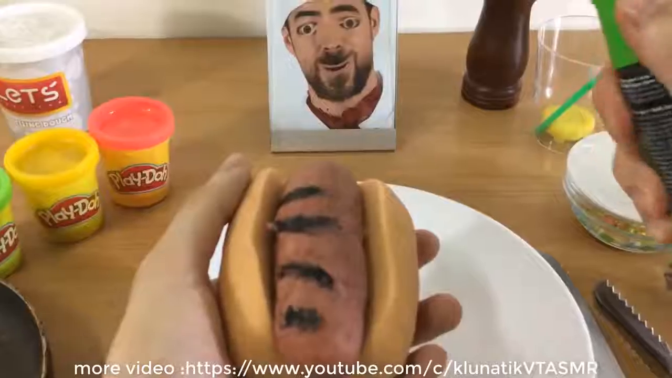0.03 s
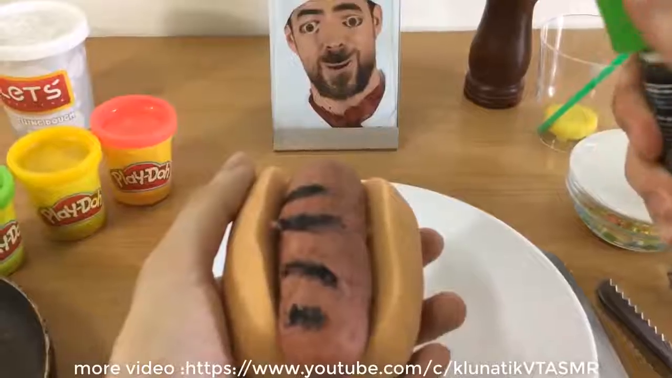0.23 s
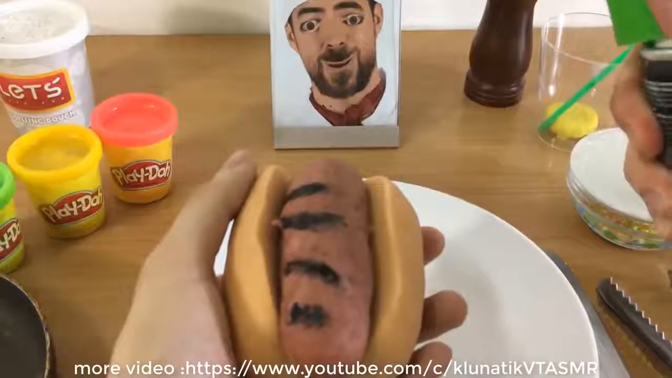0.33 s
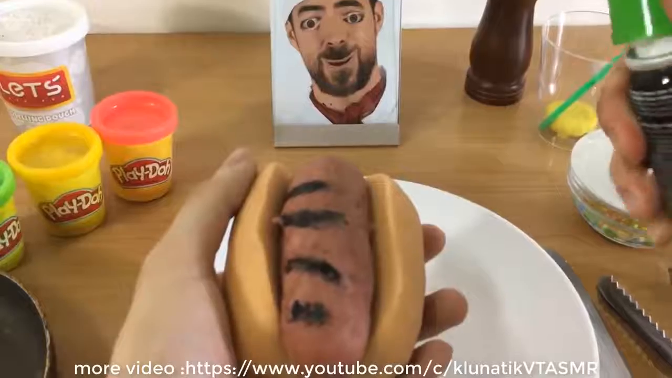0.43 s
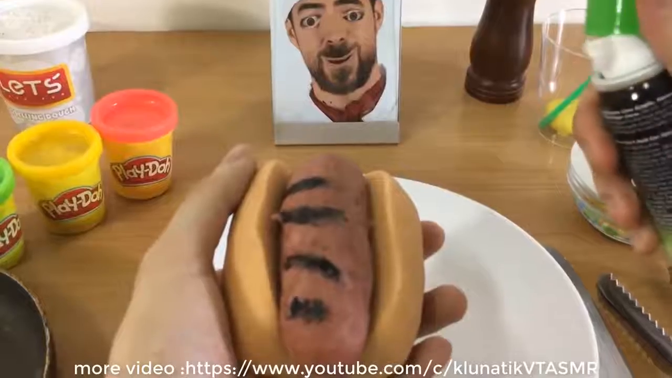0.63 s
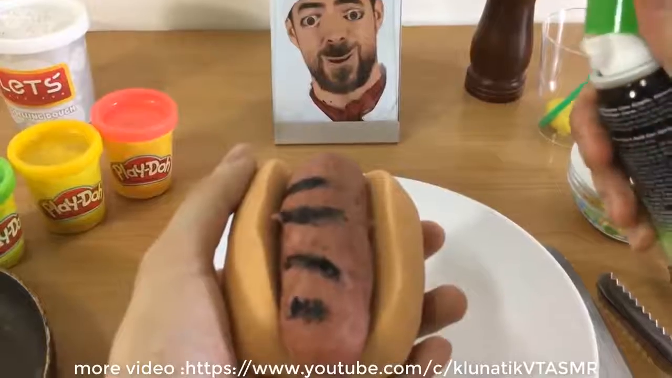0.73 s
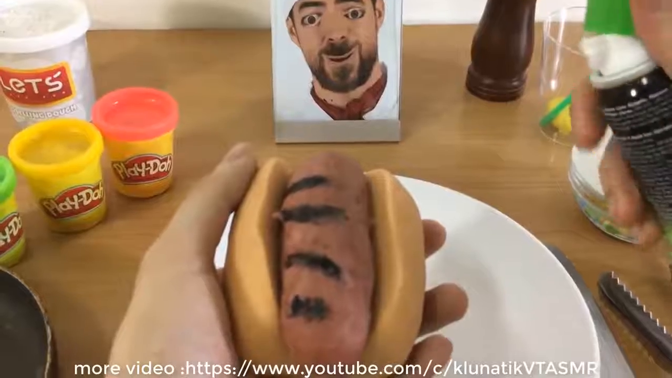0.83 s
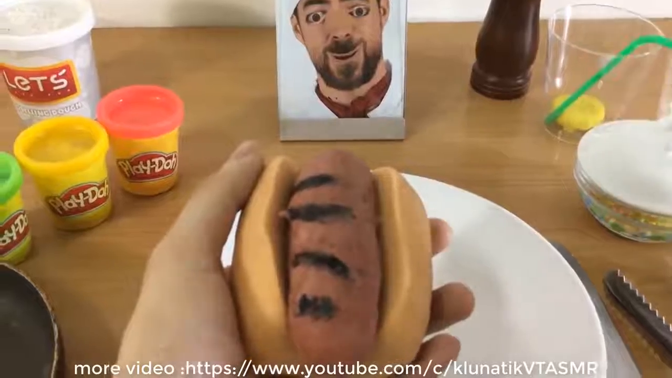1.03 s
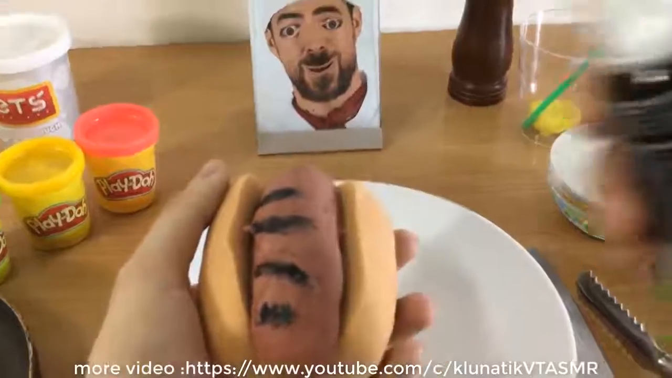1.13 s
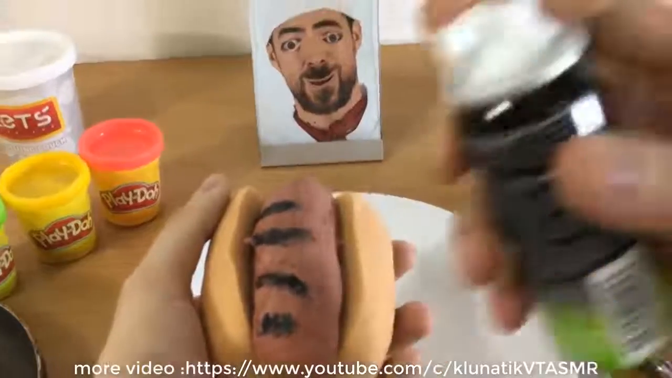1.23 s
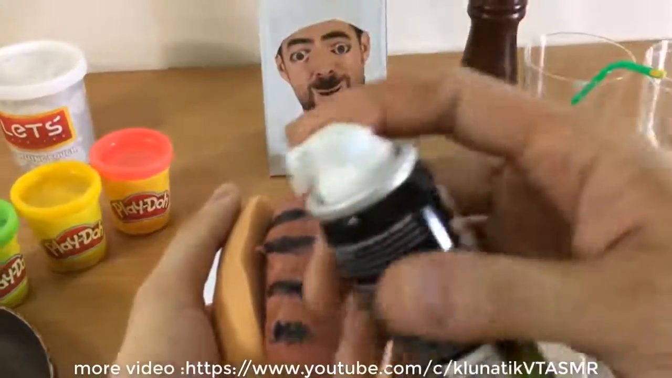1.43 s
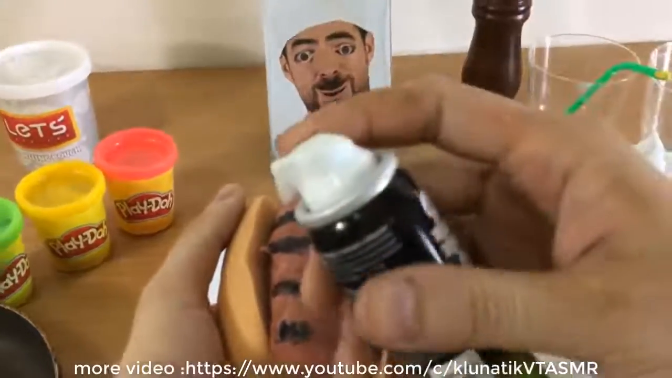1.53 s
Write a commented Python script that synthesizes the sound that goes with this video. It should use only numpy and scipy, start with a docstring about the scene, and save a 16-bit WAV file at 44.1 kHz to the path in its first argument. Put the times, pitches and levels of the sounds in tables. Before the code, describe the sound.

Plastic cap pops off a spray can, after a small click, with faint finger handling indoors

```python
"""Close at a table in a hard-walled room, on two microphones: a low house hum runs under everything.
Fingers rub and tick on an aerosol can; its plastic cap slips one notch, then pops free with a puff of
air, and the room rings after each. Then the fingers rub and tick on the can again.
Hum, crack, ticks, rubs and room are shaped noise; the cap and the air under it are decaying sines."""
import sys
import numpy as np
from scipy import signal
from scipy.fft import rfft, irfft, next_fast_len
from scipy.io import wavfile

SR = 44100
rng = np.random.default_rng(int(sys.argv[2]) if len(sys.argv) > 2 else 0)


def unload_audio(sound):
    """Save the sound as a 16-bit wav file, at the path given as the first command line argument."""
    columns = np.transpose(np.atleast_2d(sound))
    # keep every value between -1 and 1, then stretch to whole-number steps
    steps = np.round(np.clip(columns, -1, 1) * 32767)
    wavfile.write(sys.argv[1], SR, steps.astype(np.int16))


def convert_level_to_amplitude(level_db):
    """Map a level in decibels to its linear amplitude factor."""
    exponent = np.asarray(level_db, float) / 20
    return 10 ** exponent


N = 70560

# House hum and microphone hiss, spectrum: f/Hz, relative level/dB
HUM_SPECTRUM = [(12, -33), (20, -10.5), (33, -1), (45, 4), (62, -2.5), (100, -3), (125, -7.5), (165, -7),
                (205, -1.5), (235, -10), (280, -10.5), (614, -19.5), (910, -20.5), (1270, -25.5),
                (1600, -26.5), (2000, -34), (5640, -43.5), (11500, -46.5), (13000, -55.5), (16400, -82.5)]
# Likeness of the hum at the two microphones: f/Hz, likeness/1
HUM_LIKENESS = [(60, 0.19), (180, 0.65), (420, 0.12), (900, 0.86), (1650, 0.59), (4970, 0.074),
                (15000, 0.05)]
# Balance of the hum: f/Hz, left over right/dB
HUM_BALANCE = [(60, 4), (240, 1), (950, -1.5), (3770, -2), (15000, 1)]
# Phase lead of the left microphone, for room and hum: f/Hz, lead/rad
LEFT_LEAD = [(150, 0.55), (450, 0.22), (1500, 0.28), (4000, 0.0203)]
# Decay of the late room tail: f/Hz, t60/s
ROOM_DECAY = [(100, 0.64), (220, 0.92), (500, 0.61), (1000, 0.86), (1800, 0.87), (3000, 0.68), (5500, 0.73),
              (8000, 0.62), (11000, 0.5), (13000, .36), (16000, 0.25)]
# Colour of the room after a pop: f/Hz, relative level/dB
ROOM_SPECTRUM = [(35, -46.5), (60, -18), (268, -1), (458, -2), (682, -5), (842, -16), (1010, -7),
                 (1910, -15.5), (2410, -15.5), (5210, -19.5), (7060, -27), (11000, -27.5), (14600, -29),
                 (16000, -52.5)]
# Likeness of the room at the two microphones: f/Hz, likeness/1
ROOM_LIKENESS = [(60, 0.41), (240, 0.25), (950, 0.45), (3000, 0.76), (6000, 0.17), (15000, 0.25)]
# Balance of the room: f/Hz, left over right/dB
ROOM_BALANCE = [(200, 3), (900, -1.1), (3000, -2), (6000, -3.5), (11000, 1.2)]
# Skin rubbing on the can: t/s, rise/s, hold/s, fall/s, rms level/dB, centre f/Hz, width/octaves
FINGER_RUBS = [(.001, 0.0033, 0.22, .03, -64, 3030, 0.38), (.002, 0.0055, 0.15, .04, -67, 10200, 1.4),
               (0.086, 0.032, 0.018, 0.026, -55.5, 6950, 0.66),
               (0.111, 0.0054, 0.025, .006, -58.5, 4180, 0.069),
               (0.636, 0.06, 0.15, 0.049, -71.5, 10200, 0.64),
               (0.823, 0.014, 0.08, 0.074, -64.5, 2380, 0.18), (0.86, 0.027, 0.029, 0.1, -59, 1700, 0.097),
               (0.811, .01, 0.018, .015, -65, 2550, 0.11), (0.898, 0.0062, 0.012, .008, -58.5, 2000, 0.5),
               (0.871, 0.0024, 0.039, 0.0067, -62.5, 6080, 1.5),
               (1.145, 0.0055, 0.023, 0.0063, -64.5, 4260, 1),
               (1.154, 0.0035, 0.013, 0.0039, -63.5, 4450, .1),
               (1.155, 0.0052, 0.011, 0.011, -42.5, 216, 0.22)]
# Small ticks of plastic: t/s, onset level/dB, centre f/Hz, width/Hz, t60/s, left over right/dB
FINGER_TICKS = [(0.0597, -52.5, 10500, 2050, 0.004, -2), (0.0621, -57, 6150, 1550, 0.016, -6),
                (.2124, -50.5, 5900, 4000, 0.017, 5), (0.2132, -48, 10700, 900, 0.0077, -7),
                (.874, -59, 4870, 496, 0.024, -2), (0.8755, -54, 2700, 900, 0.05, -10),
                (.876, -61, 6600, 800, .03, -2), (.8765, -61, 8400, 500, .03, -2),
                (0.904, -44, 1700, 160, 0.04, -10), (0.9057, -45.5, 2410, 450, 0.025, -8),
                (1.1437, -57, 5650, 900, .025, -11), (1.1451, -54, 2350, 400, 0.04, -6.5),
                (1.146, -51, 3750, 504, 0.03, -11.5), (1.286, -63, 2246, 248, 0.066, -2)]
# Rush of air as the cap comes free: t/s, peak level/dB, half width/s, left over right/dB
AIR_PUFFS = [(.3929, -9.5, .00036, 16)]
# Modes of the plastic cap: f/Hz, relative level/dB, t60/s
CAP_MODES = [(93, -24.5, 0.026), (730, -8, .014), (1035, -7.5, .018), (1315, -7.5, 0.022),
             (1592, -8.5, .008), (1820, -5.5, .009), (4450, -32.5, 0.031), (4730, -25.5, .02),
             (5650, -18, 0.017), (7600, -15.5, 0.011)]
# Spectrum of the crack: f/Hz, relative level/dB
CRACK_SPECTRUM = [(1350, -25), (2300, 1.5), (2960, 0), (5570, -9), (6710, -5), (8360, -12), (11000, -11.5),
                  (12500, -21), (14100, -12.5), (16000, -36)]
# The slip and the pop: t/s, ring level/dB, crack level/dB, hollow left over right/dB, left leads/ms,
# upper modes level/dB, room level/dB, crack mids level/dB, crack after/s, hollow f/Hz,
# crack left over right/dB, crack left-right likeness/1, room treble level/dB, hollow starts earlier/s
CAP_RELEASES = [(0.242, -14.5, -25.5, -1.5, 0.0082, 1.5, -5.5, -12, 0.0005, 402, 1, 1, 0.5, 0.00058),
                (0.3919, -1.5, -10.5, -11, 0.538, -9.5, 13, -3, 0.0019, 487.6, -5, 0.4, -1.37, 0.000034)]

HUM_DB = -45.5  # rms
ROOM_DELAY_S, SMALL_ROOM_DB = 0.0087, -8.5  # wait before the room answers; room on the fingers
EARLY_DB, EARLY_SHARE = -9.5, 0.16  # near walls over the late tail; their t60 over the late one
RUB_GRAIN_DB, RUB_GRAIN_HZ = 2.5, 400  # rms and top frequency of the roughness in a rub
RUB_SPREAD = 0.535  # side over mid
RING_ATTACK_CYCLES = 0.48  # soft start of each cap mode
HOLLOW_T60_S, HOLLOW_ATTACK_CYCLES = 0.016, 0.22  # the air under the cap
CATCH_S, CATCH_DB = 0.0018, -11.5  # the rim catches this long before release
SCRAPE_S, CRACK_T60_S = 0.004, 0.0043  # time for a 20 dB rise into the crack; its fall
SHUDDER_DB, SHUDDER_T60_S = -4.5, 0.029  # rattle after the crack


def unit(x):
    """Scaled to rms 1."""
    return x / np.sqrt(np.mean(x ** 2) + 1e-20)


def along(points, hz):
    """Reads (f/Hz, value) points on a log frequency axis."""
    f, v = np.transpose(points)
    return np.interp(np.log(hz + 1), np.log(f + 1), v)


def filtered(x, response):
    """x times a response of frequency."""
    n = x.shape[-1]
    m = next_fast_len(n + 8192)
    return irfft(rfft(x, m) * response(np.fft.rfftfreq(m, 1 / SR)), m)[..., :n]


def pan(db):
    """Left and right gains for a left-over-right level."""
    return convert_level_to_amplitude([[db / 2], [-db / 2]])


def noise_pair():
    """Two unrelated white noises as long as the scene."""
    return rng.standard_normal((2, N))


def paired(pair, spectrum, alike):
    """Two unrelated noises coloured and mixed to a left-right likeness."""
    def mid_and_side(hz):
        turn = np.arccos(along(alike, hz)) / 2
        return convert_level_to_amplitude(along(spectrum, hz)) * [np.cos(turn), np.sin(turn)]
    mid, side = filtered(pair, mid_and_side)
    return np.array([mid + side, mid - side])


def placed(x, balance):
    """Level and phase between the two microphones, by frequency."""
    half = np.array([[0.5], [-0.5]])
    return filtered(x, lambda hz: convert_level_to_amplitude(along(balance, hz) * half) * np.exp(1j * along(LEFT_LEAD, hz) * half))


def hum():
    """Steady rumble of the house and hiss of the microphones, as coloured noise."""
    x = unit(paired(noise_pair(), HUM_SPECTRUM, HUM_LIKENESS))
    return convert_level_to_amplitude(HUM_DB) * placed(x, HUM_BALANCE)


def room_tail(spectrum):
    """Hard-walled room as decaying noise: each frequency dies at its own speed, faster at first."""
    hz, t, z = signal.stft(rng.standard_normal((2, SR)), SR, nperseg=256)
    fall_db = -60 * t / along(ROOM_DECAY, hz)[:, None]
    envelope = convert_level_to_amplitude(fall_db) + convert_level_to_amplitude(EARLY_DB + fall_db / EARLY_SHARE)
    x = signal.istft(z * envelope, SR, nperseg=256)[1]
    x = np.pad(x, ((0, 0), (round(ROOM_DELAY_S * SR), 0)))
    x = paired(x, spectrum, ROOM_LIKENESS)
    return placed(x / np.linalg.norm(x[0]), ROOM_BALANCE)  # left energy is 1 before placing


def rubs():
    """Skin on the can: bands of noise made grainy by a slow random level."""
    out, t = np.zeros((2, N)), np.arange(N) / SR
    for s, rise, hold, fall, db, centre_hz, octaves in FINGER_RUBS:
        shape = np.interp(t, np.cumsum([s, rise, hold, fall]), [0, 1, 1, 0]) ** 2
        grain = unit(filtered(rng.standard_normal(N), lambda hz: hz < RUB_GRAIN_HZ))
        band = lambda hz: np.exp(-0.5 * (np.log2((hz + 1) / centre_hz) / octaves) ** 2)
        mid, side = filtered(noise_pair(), band)
        rub = mid + RUB_SPREAD * np.array([side, -side])
        out += convert_level_to_amplitude(db) * shape * unit(convert_level_to_amplitude(RUB_GRAIN_DB * grain) * rub)
    return out


def ticks():
    """Small ticks of plastic: resonant bands of noise that start at once and die away."""
    out, t = np.zeros((2, N)), np.arange(N) / SR
    for s, db, centre_hz, width_hz, t60, pan_db in FINGER_TICKS:
        band = lambda hz: 1 / (1 + ((hz - centre_hz) / width_hz * 2) ** 2)
        snap = unit(filtered(rng.standard_normal(N), band))
        out += pan(pan_db) * convert_level_to_amplitude(db - 60 * abs(t - s) / t60) * (t > s) * snap
    return out


def fingers():
    """Rubs and ticks on the can, with the room's answer to their mono sum."""
    close = rubs() + ticks()
    wet = signal.fftconvolve(close.mean(0)[None], room_tail([(1000, 0)]), axes=1)[:, :N]
    return close + convert_level_to_amplitude(SMALL_ROOM_DB) * wet


def puffs():
    """Air rushing as the cap comes free: a short pressure dip between two opposite swings."""
    out, t = np.zeros((2, N)), np.arange(N) / SR
    for s, db, half_s, pan_db in AIR_PUFFS:
        z = ((t - s) / half_s) ** 2
        out -= pan(pan_db) * convert_level_to_amplitude(db) * (1 - z) * np.exp(-0.5 * z)
    return out


def cap_ring(u, upper_db):
    """Modes of the plastic cap: decaying sines with a soft start at u = 0."""
    after = np.clip(u, 0, None)
    ring = np.zeros_like(u)
    for hz, db, t60 in CAP_MODES:
        level = convert_level_to_amplitude(db + upper_db * (hz > 1500) - 60 * after / t60)
        attack = 1 - np.exp(-(after * hz / RING_ATTACK_CYCLES) ** 2)
        ring += level * attack * np.sin(2 * np.pi * hz * after)
    return ring


def hollow_air(u, hz):
    """Air resonating under the cap: one low decaying sine from u = 0."""
    turns = np.clip(u, 0, None) * hz
    attack = 1 - np.exp(-(turns / HOLLOW_ATTACK_CYCLES) ** 2)
    return convert_level_to_amplitude(-60 * turns / hz / HOLLOW_T60_S) * attack * np.sin(2 * np.pi * turns)


def crack(u, late_s, mids_db, alike):
    """Rim giving way: noise that catches, scrapes up to the crack, falls and shudders."""
    v = u - late_s
    caught = u > -CATCH_S
    scrape = convert_level_to_amplitude(20 * np.clip(v, -1, 0) / SCRAPE_S) * caught
    fall = convert_level_to_amplitude(-60 * abs(v) / CRACK_T60_S) + convert_level_to_amplitude(SHUDDER_DB - 60 * abs(v) / SHUDDER_T60_S)
    catch = convert_level_to_amplitude(CATCH_DB - 60 * abs(u + CATCH_S) / CRACK_T60_S) * caught
    noise = unit(paired(noise_pair(), CRACK_SPECTRUM, [(1000, alike)]))
    mids = [(2000, mids_db), (3600, mids_db), (4600, 0)]
    noise = filtered(noise, lambda hz: convert_level_to_amplitude(along(mids, hz)))
    return (np.where(v < 0, scrape, fall) + catch) * noise


def pops():
    """The slip and the pop of the cap: ring, hollow air and crack, each pop with the room's answer."""
    out, t = np.zeros((2, N)), np.arange(N) / SR
    for (s, ring_db, crack_db, hollow_pan_db, lead_ms, upper_db, room_db, mids_db, crack_s,
         hollow_hz, crack_pan_db, alike, treble_db, early_s) in CAP_RELEASES:
        u = t - s + np.array([[lead_ms], [0]]) / 1000  # time since release, left and right
        ring = cap_ring(u, upper_db) + pan(hollow_pan_db) * hollow_air(u + early_s, hollow_hz)
        out += convert_level_to_amplitude(ring_db) * ring
        out += pan(crack_pan_db) * convert_level_to_amplitude(crack_db) * crack(u, crack_s, mids_db, alike)
        treble = [(700, 0.023), (1500, treble_db)]
        answer = filtered(room_tail(ROOM_SPECTRUM), lambda hz: convert_level_to_amplitude(along(treble, hz)))
        i = round(s * SR)
        out[:, i:i + answer.shape[1]] += convert_level_to_amplitude(room_db) * answer[:, :N - i]
    return out


def scene():
    """Everything at the two microphones."""
    return hum() + fingers() + puffs() + pops()


def roll_off(x):
    """The treble ends steeply here."""
    return signal.sosfilt(signal.butter(12, 16550, fs=SR, output="sos"), x)


def record(dry):
    """Loud peaks flatten smoothly against a ceiling just under full scale."""
    ceiling, hardness = 0.96, 6
    mix = dry / (1 + abs(dry / ceiling) ** hardness) ** (1 / hardness)
    return roll_off(mix)


dry = scene()
out = record(dry)
unload_audio(out)
```